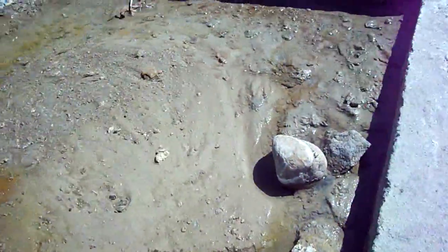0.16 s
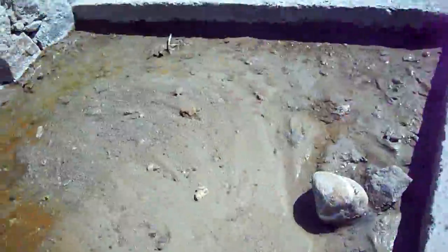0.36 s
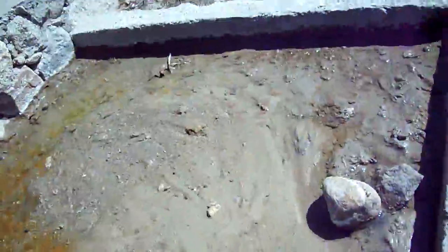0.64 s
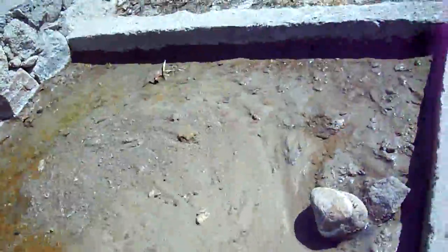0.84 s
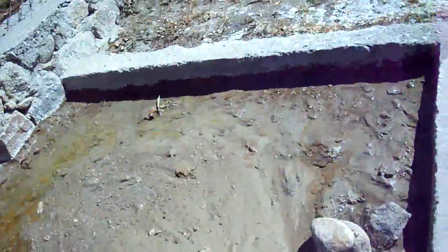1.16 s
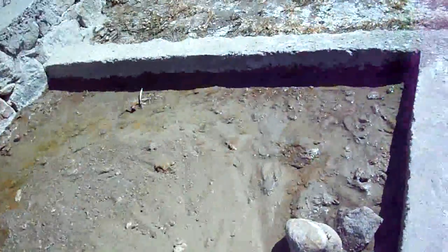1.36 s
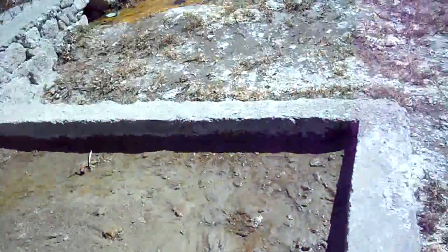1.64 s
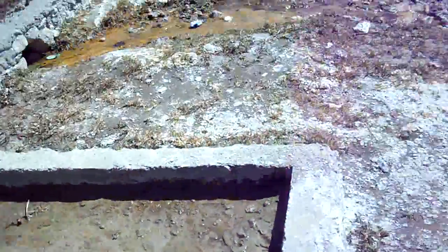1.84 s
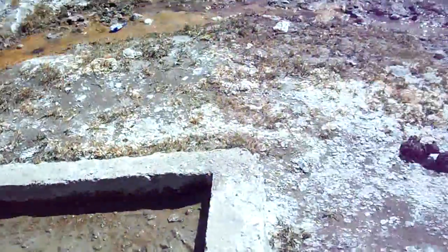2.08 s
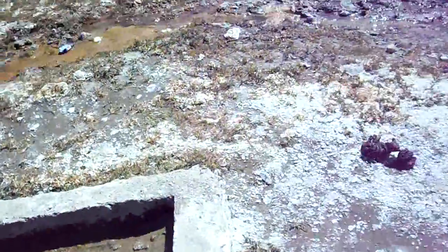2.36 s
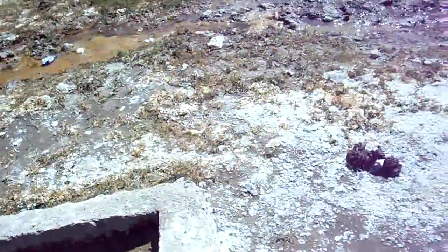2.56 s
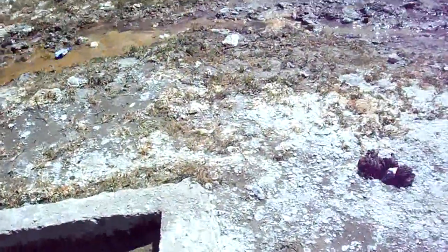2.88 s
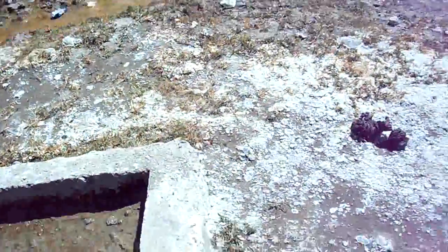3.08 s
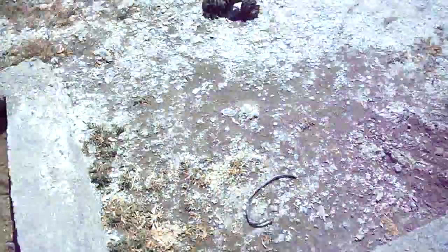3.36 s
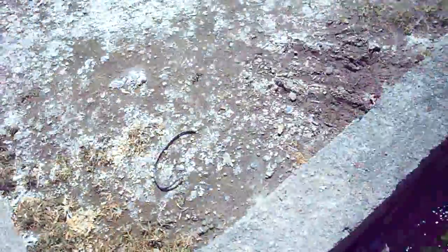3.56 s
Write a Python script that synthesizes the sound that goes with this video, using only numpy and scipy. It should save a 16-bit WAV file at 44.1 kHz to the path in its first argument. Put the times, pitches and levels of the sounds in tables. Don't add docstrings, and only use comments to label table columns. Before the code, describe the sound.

A steady rush of shallow water in an outdoor stone channel, made of fine fizzing bubbles. A wind gust thumps the microphone immediately. From 0.4 to 1.3 s the water churns with gurgles, plops and bright spitting droplets. Wind buffets heavily around 1.9-2.2, 2.8 and 3.2-3.4 s while single drops thin out; babbling swells again from 3.2 s to the end at 3.7 s.

```python
import sys
import numpy as np
from scipy import signal
from scipy.fft import rfft, irfft, next_fast_len
from scipy.io import wavfile
from scipy.ndimage import uniform_filter1d, map_coordinates

SR = 44100
rng = np.random.default_rng(int(sys.argv[2]) if len(sys.argv) > 2 else 0)


def volts_from_decibels(level):
    exponent = np.asarray(level, float) / 20
    return 10 ** exponent


def to_wav(s):
    ch = np.atleast_2d(s).T
    pcm = np.round(np.clip(ch, -1, 1) * 32767)
    wavfile.write(sys.argv[1], SR, pcm.astype(np.int16))


N = 164052

# start_s, level_db
WIND_PRESSURE = [(0.0, -36), (0.4, -37.5), (0.58, -41.5), (0.78, -42.5), (0.97, -34), (1.45, -41),
                 (1.66, -34.5), (1.82, -32), (2.11, -28.5), (2.28, -29.5), (2.53, -29), (2.67, -30.5),
                 (3.04, -34), (3.38, -27.5), (3.57, -34), (3.72, -34)]
# freq_hz, density_db_per_hz
RUMBLE_SPECTRUM = [(8, -45), (22, -1.5), (55, -12), (110, -24), (200, -39), (400, -59.5)]
# freq_hz, density_db_per_hz
FLUTTER_SPECTRUM = [(25, -1.5), (60, 1.5), (100, 1.5), (150, -7), (250, -20.5), (450, -28), (900, -58)]
# start_s, peak_db, pitch_hz
GUSTS = [(0.022, -17.5, 92.4), (0.06, -17.5, 93.7), (0.091, -13.5, 74), (0.414, -21, 49.3),
         (0.841, -19.5, 58.4), (0.928, -23.5, 82), (1.107, -26, 68.7), (1.649, -16.5, 50),
         (1.848, -39, 57.2), (1.889, -10.5, 80), (1.939, -16, 95), (1.993, -11.5, 51.5),
         (2.04, -13.5, 71.7), (2.07, -17, 116), (2.158, -18, 49), (2.21, -24, 79), (2.321, -19.5, 50),
         (2.591, -19.5, 80), (2.67, -19.5, 72), (2.779, -10, 66), (2.829, -12, 95.4), (3.041, -21, 64),
         (3.195, -8, 85), (3.255, -11.5, 107.4), (3.381, -13, 128), (3.51, -24.5, 45.4)]
# start_s, peak_db, pitch_hz
EDDIES = [(.23, -27, 44.6), (.865, -29.5, 68.6), (.962, -24.5, 60.4), (1.23, -27.5, 56), (1.48, -40, 106.5),
          (1.67, -24, 45), (2.105, -23, 62.4), (2.4, -26.5, 99), (2.49, -28.5, 60.4), (2.9, -25, 60),
          (3.285, -19.5, 60), (3.59, -32, 44.5), (3.615, -23.5, 46)]
# start_s, level_db
FLOW = [
    (0.0, -43),
    (0.29, -43),
    (3.72, -45.5),
]
# freq_hz, density_db_per_hz
RUSH_SPECTRUM = [(88, -32), (150, -6.5), (208, 0.5), (461, -9), (597, -4.5), (1060, -9), (4280, -17),
                 (7300, -25), (9300, -26.5), (12100, -71), (20500, -120)]
# centre_s, length_s, babble_gain_db
CHURNS = [
    (0.514, 0.16, 1.5),
    (0.657, 0.48, 6),
    (1.008, 0.29, 3),
    (3.237, 0.53, 7.5),
    (3.676, 0.23, 7.5),
]
# centre_s, length_s, fizz_gain_db
SPLASHES = [
    (0.495, 0.085, 6.5),
    (0.607, 0.027, 5),
    (1.199, 0.03, 3.5),
    (2.026, 0.09, 5),
    (2.557, 0.017, 11),
    (3.052, 0.014, -12),
    (3.254, 0.011, -8),
    (3.655, 0.039, 9),
]
# start_s, peak_db, pitch_hz
GURGLES = [(0.42, -28, 242), (0.695, -31, 212), (0.878, -31, 617), (3.372, -33.5, 743), (0.457, -26.5, 376),
           (0.484, -24, 287), (0.504, -26.5, 510), (0.585, -25, 630), (0.681, -28.5, 520),
           (0.749, -19.5, 232), (0.947, -28.5, 323), (2.309, -29, 610), (2.363, -27.5, 342),
           (2.545, -28, 745), (3.388, -26, 680), (3.66, -39, 764)]
# start_s, peak_db, pitch_hz
PLOPS = [(0.0195, -28, 1890), (0.1833, -27.5, 1170), (0.2074, -19.5, 3460), (0.2132, -27, 2440),
         (0.2667, -25, 2650), (0.2886, -35, 1540), (0.381, -26, 1510), (0.4484, -29, 3030),
         (0.4994, -29, 2000), (0.5314, -22, 1125), (0.602, -20.5, 1240), (0.623, -21, 1380),
         (0.7118, -25.5, 3120), (0.7214, -17.5, 1580), (0.7952, -18.5, 2570), (1.0904, -25, 2730),
         (1.1316, -15.5, 3240), (1.1837, -25.5, 1410), (1.2773, -34, 2590), (1.5979, -20.5, 2700),
         (1.6527, -21.5, 2160), (1.7667, -14, 3120), (1.8524, -27.5, 3030), (1.8884, -24, 2470),
         (2.139, -21.5, 2840), (2.579, -26, 1850), (3.1033, -31.5, 1730), (3.253, -27.5, 1600),
         (3.5626, -27.5, 1100)]
# start_s, peak_db, pitch_hz
PATTER = [(0.249, -28, 1640), (0.3014, -27, 1480), (0.4697, -36, 1820), (0.603, -19, 1600),
          (0.7935, -28, 2090), (0.819, -26, 1730), (0.95, -39, 2340), (0.967, -27, 1450),
          (1.015, -28, 2100), (1.0793, -28, 1580), (1.436, -31.5, 1520), (2.2134, -28.5, 1410),
          (2.7066, -33, 1890), (2.835, -31.5, 1630), (2.9148, -29, 1500), (3.034, -27, 1450),
          (3.0468, -26.5, 1700), (3.073, -25, 2120), (3.1435, -29.5, 1930), (3.276, -24, 1720),
          (3.325, -30, 1700), (3.46, -25, 1630), (3.5455, -32, 1840), (3.5844, -30, 1910),
          (3.66, -26.5, 1640), (3.6804, -26, 1810), (3.702, -23, 1470)]
# start_s, peak_db, pitch_hz
TICKS = [(0.4373, -24, 3180), (0.5142, -29, 3200), (0.6293, -23.5, 7000), (0.7029, -26, 5600),
         (1.064, -30, 4450), (1.104, -24, 4040), (1.1221, -19.5, 4200), (1.2094, -26, 4700),
         (1.289, -21, 4130), (1.795, -24, 3950), (2.0627, -29.5, 3200), (2.4067, -27.5, 3330),
         (2.9565, -24.5, 3400), (3.1507, -23, 4260), (3.2756, -27.5, 3300), (3.3929, -30, 2730),
         (3.4275, -28.5, 3000), (3.4749, -28, 3370), (3.5157, -26.5, 3200)]
# start_s, peak_db, pitch_hz
SPRAY = [(0.0754, -23, 6150), (0.231, -34, 5370), (0.282, -26, 5700), (0.4897, -36, 5200), (0.5, -24, 6700),
         (0.5151, -21, 6140), (0.7212, -20, 5500), (0.7945, -19.5, 6700), (0.9137, -31, 4860),
         (1.1297, -26, 5520), (1.2881, -20.5, 6400), (1.482, -49, 5170), (1.6518, -31, 6400),
         (1.768, -42, 5000), (1.9035, -27.5, 5000), (2.0267, -39, 5100), (2.061, -33, 5000),
         (2.3356, -79, 6500), (2.4635, -38, 4900), (2.5785, -35, 5400), (2.7396, -37, 5130),
         (3.3266, -36, 6220), (3.424, -27, 7600), (3.5602, -28, 6440), (3.649, -28.5, 6190),
         (3.6695, -25, 7730), (3.6959, -38, 5440)]
# start_s, peak_db, pitch_hz
SPITS = [(0.0665, -25.5, 3740), (0.184, -21.5, 3800), (0.2511, -21.5, 4670), (0.3035, -18.5, 6000),
         (0.5367, -29, 4700), (0.554, -22, 6100), (0.574, -25, 4550), (0.6235, -27, 4850),
         (0.643, -29, 5890), (0.6515, -11.5, 7500), (0.7115, -28, 5070), (0.7934, -32, 4060),
         (0.858, -25, 4600), (0.9314, -27, 4330), (1.055, -22.5, 3750), (1.1303, -22.5, 4140),
         (1.1842, -26.5, 3500), (1.2859, -21.5, 4400), (1.5916, -27, 4400), (1.7225, -20.5, 5220),
         (1.77, -21.5, 4180), (1.801, -22, 4520), (1.8532, -23.5, 3800), (2.492, -25, 4560),
         (2.7065, -26.5, 4430), (2.763, -25, 4800), (2.884, -21, 3980)]
# freq_hz, gain_db
MIC_RESPONSE = [(6000, -0.5), (7300, -0.5), (7900, -5.5), (8600, -8.5), (9300, -15.5), (9900, -28),
                (10600, -62), (14000, -68)]

RUSH_DB, FIZZ_DB, BABBLE_DB = 0.5, -1.5, -6
CLUMP_DB, CLUMP_PITCH = 1.6, 0.25
MIC_OFFSET = -0.0135


def unit(x):
    return x / np.sqrt(np.mean(x ** 2) + 1e-20)


def curve(rows):
    time_s, value = np.transpose(rows)
    return np.interp(np.arange(N) / SR, time_s, value)


def wobble(rate_hz):
    return map_coordinates(rng.standard_normal(400), [np.arange(N) * rate_hz / SR])


def swells(rows):
    t = np.arange(N) / SR
    return sum(db * np.exp(-((t - s) / length_s * 2) ** 2) for s, length_s, db in rows)


def coloured(x, points):
    size = next_fast_len(N + 8192)
    hz, db = np.transpose(points)
    bin_hz = np.fft.rfftfreq(size, 1 / SR)
    gain = volts_from_decibels(np.interp(np.log(bin_hz + 1), np.log(hz + 1), db))
    return irfft(rfft(x, size) * gain, size)[:N]


def bubbles(start_s, peak_db, hz, cycles, rise, soft, spray, size):
    start_s, peak_db, hz, cycles = (np.asarray(v)[:, None] for v in (start_s, peak_db, hz, cycles))
    t = np.arange(size) / SR
    age = t * hz / cycles
    tone = np.sin(2 * np.pi * hz * t * (1 + rise * np.minimum(age, 2) / 2))
    noise = uniform_filter1d(rng.standard_normal(age.shape), size=3, axis=1)
    puff = spray * noise * np.exp(-age)
    envelope = np.exp(-age) * (1 - np.exp(-age / abs(soft))) * (1 - t / t[-1])
    body = volts_from_decibels(peak_db) * envelope * (tone + puff)
    at = np.round(start_s * SR).astype(int) + np.arange(size)
    return np.bincount(np.maximum(at, 0).ravel(), body.ravel(), N + size)[:N]


def drops(rows, lift_db, cycles, rise, soft, spray, size):
    start_s, peak_db, hz = np.transpose(rows)
    life = cycles * np.exp(0.12 * rng.standard_normal(len(start_s)))
    return bubbles(start_s, peak_db + lift_db, hz, life, rise, soft, spray, size)


def wind():
    t = np.arange(N) / SR
    rumble = unit(volts_from_decibels(0.77 * wobble(9.5)) * coloured(rng.standard_normal(N), RUMBLE_SPECTRUM))
    flutter = unit(volts_from_decibels(2 * wobble(25)) * coloured(rng.standard_normal(N), FLUTTER_SPECTRUM))
    gust_level = sum(volts_from_decibels(db - 14.5) * np.exp(-((t - s - 0.018) / 0.034) ** 2) for s, db, hz in GUSTS)
    pressure_db = curve(WIND_PRESSURE)
    flutter_level = gust_level + volts_from_decibels(pressure_db - 9.5 + 2.6 * wobble(8.9))
    thumps = drops(GUSTS, lift_db=7.0, cycles=0.71, rise=0.061, soft=0.66, spray=0, size=5000)
    push = volts_from_decibels(pressure_db) * rumble + flutter_level * flutter - thumps
    return push + 0.5 * push * abs(push)


def soft_eddies():
    return -drops(EDDIES, lift_db=13.5, cycles=1.0, rise=0.08, soft=1.0, spray=0, size=5000)


def patchy_rush():
    z = signal.stft(rng.standard_normal(N), nperseg=256)[2]
    field = uniform_filter1d(rng.standard_normal(z.shape), size=8, axis=0)
    field = uniform_filter1d(field, size=5, axis=1)
    noise = signal.istft(z * volts_from_decibels(2.05 * unit(field)), nperseg=256)[1][:N]
    return unit(coloured(noise, RUSH_SPECTRUM))


def swarm(hz, octaves, cycles, scatter_db, count, size):
    u, g = rng.random((count, 2)), rng.standard_normal((count, 3))
    start_s = np.sort(u[:, 0]) * N / SR
    clump = (start_s * 45).astype(int)
    centre = rng.standard_normal((400, 2))[np.minimum(clump, 399)]
    loud = np.minimum(-np.log(u[:, 1] + 1e-9), 2.0)
    peak_db = scatter_db * loud + CLUMP_DB * centre[:, 1]
    pitch_hz = np.clip(hz * 2 ** (octaves * (g[:, 0] + CLUMP_PITCH * centre[:, 0])), 150, 9000)
    life = cycles * np.exp(0.23 * g[:, 1])
    return unit(bubbles(start_s, peak_db, pitch_hz, life, rise=0.18, soft=0.13, spray=0.44, size=size))


def stream():
    rush = patchy_rush()
    splash_db, churn_db = swells(SPLASHES), swells(CHURNS)
    fizz = swarm(hz=3800, octaves=0.717, cycles=3.05, scatter_db=6.0, count=3600, size=260)
    fizz = fizz * volts_from_decibels(2.0 * wobble(13) + splash_db)
    babble = swarm(hz=1012.4, octaves=0.936, cycles=2.58, scatter_db=6.5, count=1100, size=1500)
    babble = babble * volts_from_decibels(0.47 * splash_db + churn_db)
    water = volts_from_decibels(RUSH_DB + 0.13 * churn_db) * rush + volts_from_decibels(FIZZ_DB) * fizz + volts_from_decibels(BABBLE_DB) * babble
    return volts_from_decibels(curve(FLOW)) * water


def droplets():
    gurgles = drops(GURGLES, lift_db=2.5, cycles=3.8, rise=0.069, soft=0.61, spray=0.02, size=3000)
    plops = drops(PLOPS, lift_db=2.0, cycles=3.0, rise=0.051, soft=0.19, spray=0.81, size=900)
    patter = drops(PATTER, lift_db=0.0, cycles=3.5, rise=0.02, soft=0.33, spray=0.78, size=900)
    ticks = drops(TICKS, lift_db=9.0, cycles=1.95, rise=0.023, soft=0.59, spray=1.75, size=500)
    spray = drops(SPRAY, lift_db=7.5, cycles=2.1, rise=0.031, soft=0.54, spray=2.7, size=400)
    spits = drops(SPITS, lift_db=10, cycles=2.28, rise=0.029, soft=0.65, spray=1.27, size=500)
    return gurgles + plops + patter + ticks + spray + spits


def stone_walls(x, level_db, t60_s):
    size = SR // 20
    tail = rng.standard_normal(size) * volts_from_decibels(-60 * np.arange(size) / SR / t60_s)
    return x + volts_from_decibels(level_db) * signal.fftconvolve(x, tail / np.linalg.norm(tail))[:N]


def scene():
    air = wind() + soft_eddies()
    water = stream() + stone_walls(droplets(), level_db=-5.5, t60_s=0.027)
    return (air + water)[None]


def top_cut(x):
    return signal.sosfilt(signal.butter(12, 15800, fs=SR, output="sos"), x)


def record(dry):
    x = coloured(dry[0], MIC_RESPONSE)
    x = x + volts_from_decibels(-65) * abs(x) * rng.standard_normal(N)
    return top_cut((x + MIC_OFFSET)[None])


dry = scene()
out = record(dry)
to_wav(out)
```